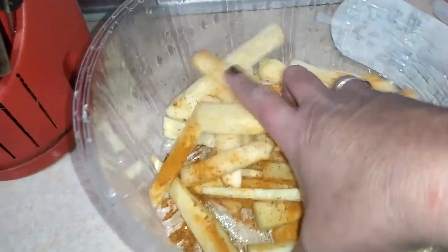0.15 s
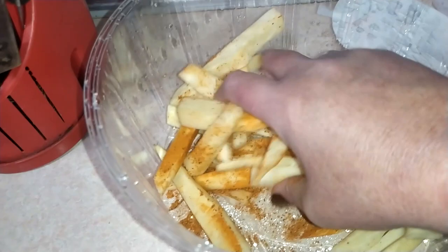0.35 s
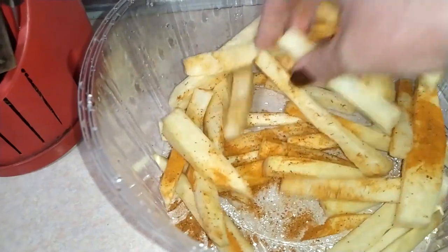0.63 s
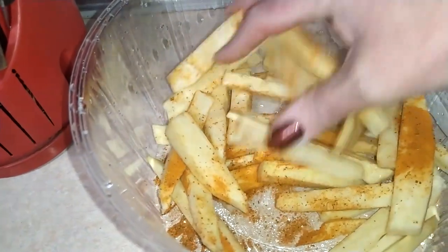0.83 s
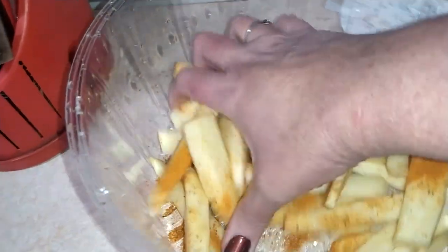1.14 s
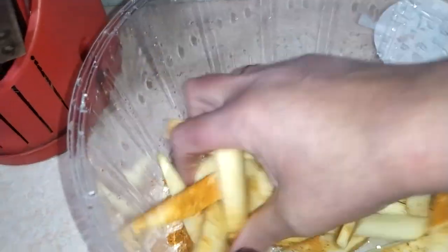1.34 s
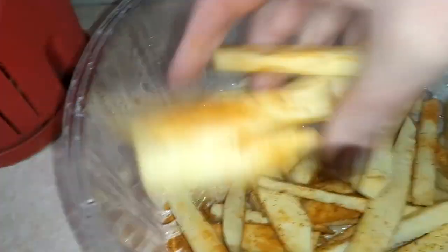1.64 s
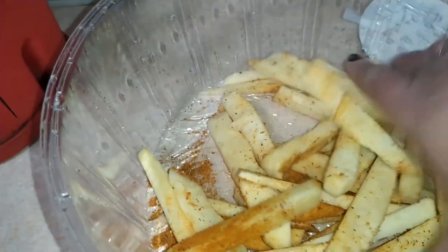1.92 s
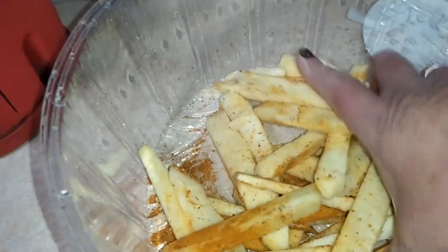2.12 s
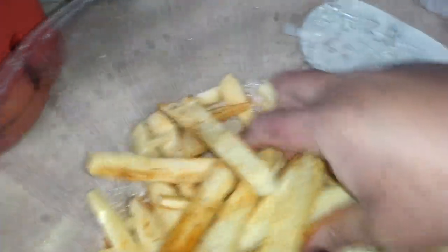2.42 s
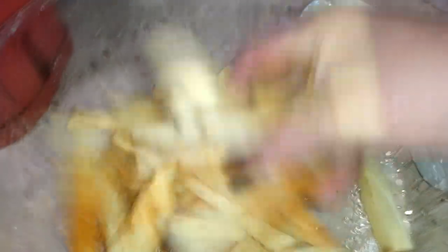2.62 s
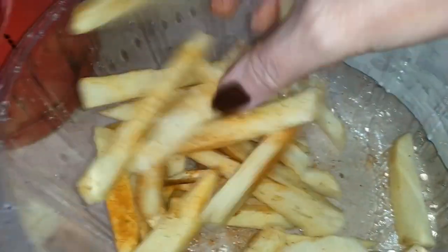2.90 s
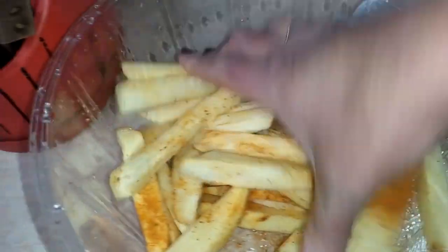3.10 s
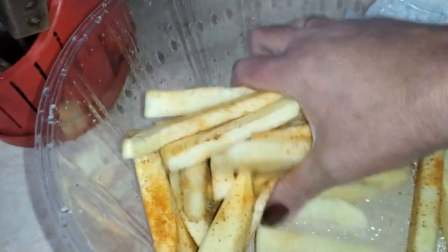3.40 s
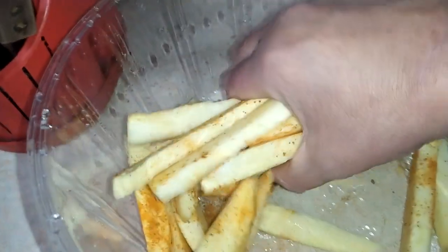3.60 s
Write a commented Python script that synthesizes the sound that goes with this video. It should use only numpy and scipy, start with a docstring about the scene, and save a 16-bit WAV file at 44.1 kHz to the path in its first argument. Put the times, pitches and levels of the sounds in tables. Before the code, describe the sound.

Raw vegetable sticks are tossed by hand in a thin plastic tub, with irregular dull thuds, woody clacks and gritty rubbing throughout, growing heavier later; close microphone, small kitchen, slightly dull sound with clipped peaks.

```python
"""Low jostling with many dull plastic thuds and clacks throughout: a hand tosses raw sweet potato sticks in a
thin tub, close up. Falling sticks excite the tub's low modes (thud), the modes of its wall (clack) and bursts
of edge grit (tick). Random contacts ring the same modes as the heap shifts; banded grains make gritty rubbing
and short scratches. A short kitchen tail and a faint, dull floor lie behind; the hardest blows clip."""
import sys
import numpy as np
from scipy import signal
from scipy.fft import rfft, irfft
from scipy.io import wavfile
from scipy.ndimage import uniform_filter1d

SR = 44100
rng = np.random.default_rng(int(sys.argv[2]) if len(sys.argv) > 2 else 0)


def pcm_store(signal):
    """Save signal as 16-bit PCM."""
    levels = np.round(np.clip(np.atleast_2d(signal), -1, 1) * 32767)
    wavfile.write(sys.argv[1], SR, levels.astype(np.int16).T)


N = 165375

# Stick landings, levels before trims: start_s, thud_db, clack_db, tick_db, clack_pitch_hz
LANDINGS = [(0.037, -19.5, -46, -32, 1130), (0.098, -17.5, -58, -25.5, 1840),
            (0.177, -17.5, -24, -23.5, 1160), (0.209, -22, -24.5, -28, 766),
            (0.286, -18, -24.5, -25.5, 1000), (0.316, -10.5, -22, -15, 3120), (0.437, -19, -34.5, -38, 780),
            (0.499, -14, -22, -38, 645), (0.544, -11.5, -24, -40, 1720), (0.553, -19, -22.5, -40.5, 1290),
            (0.717, -21, -31, -50, 1150), (0.893, -12.5, -45, -43, 1150), (0.933, -16, -17.5, -26.5, 1220),
            (0.948, -15, -21.5, -30.5, 1210), (1.092, -15.5, -21, -29, 1215),
            (1.119, -18.5, -17, -33.5, 1694), (1.1989, -11.5, -11.5, -28.5, 853),
            (1.256, -18, -19, -19.5, 2140), (1.297, -16, -11, -15, 2080), (1.337, -48, -20, -30.5, 2100),
            (1.437, -14.5, -26.5, -38, 807), (1.516, -8, -12, -25, 1135), (1.524, -10.5, -18, -28, 1094),
            (1.676, -20, -48, -58, 1040), (1.792, -27, -32.5, -41, 742), (1.809, -15.5, -28, -27.5, 1110),
            (1.831, -16, -23.5, -27.5, 1045), (1.892, -15.5, -22, -26, 800), (1.956, -17, -22, -28, 890),
            (2.041, -18, -24.5, -41.5, 1220), (2.084, -18.5, -31.5, -32.5, 830),
            (2.273, -5.5, -9.5, -7, 1820), (2.332, -10, -17.5, -35.5, 740), (2.352, -13, -20.5, -19.5, 816),
            (2.408, -13, -18.5, -48, 730), (2.538, -8.5, -20, -25.5, 830), (2.664, -15, -42, -38, 1140),
            (2.752, -8.5, -26, -24, 1600), (2.764, -14, -22, -39, 775), (2.924, -16, -16.5, -21, 1880),
            (2.968, -16, -37, -30, 920), (3.018, -7.5, -17.5, -35, 1160), (3.027, -7, -12, -19, 1142),
            (3.039, -3, -14.5, -27.5, 1040), (3.054, -15.5, -21, -56, 1150), (3.102, -45, -43, -24, 4700),
            (3.16, -12.5, -16, -34, 687), (3.22, -10.5, -26.5, -26, 742), (3.269, -10.5, -25.5, -26, 1070),
            (3.309, -20.5, -18.5, -27, 742), (3.385, -19, -21.5, -22.5, 2820),
            (3.404, -5.5, -19, -19.5, 1780), (3.437, -19, -21, -14, 1960), (3.478, -40, -24, -35, 1705),
            (3.505, -6.5, -19.5, -37.5, 1100), (3.521, -23.5, -11, -16.5, 1780),
            (3.637, -14.5, -21.5, -22, 2330)]
# Hand working the heap, levels before trims: time_s, jostle_db, rub_db
HAND_STIR = [(0, -23, -31), (0.12, -40.5, -35), (0.19, -19.5, -22.5), (0.32, -20.5, -29),
             (0.41, -35.5, -40), (0.53, -20.5, -33), (0.62, -25.5, -43), (0.86, -36, -45.5),
             (0.97, -19, -34.5), (1.035, -36, -43.5), (1.119, -25.5, -35.5), (1.275, -20.5, -24),
             (1.341, -17.5, -27), (1.385, -31, -31), (1.485, -16.5, -25.5), (1.56, -19.5, -38),
             (1.63, -25.5, -31.5), (1.775, -49, -52), (1.83, -14, -44), (1.94, -41, -33),
             (2.11, -23, -39.5), (2.218, -37, -38.5), (2.305, -8, -16), (2.45, -24.5, -29.5),
             (2.58, -22, -22.5), (2.64, -28.5, -34), (2.831, -14.5, -26), (2.905, -29, -50),
             (2.95, -11, -32), (3.1, -19, -32.5), (3.281, -14, -24.5), (3.35, -25, -37.5),
             (3.419, -16.5, -19.5), (3.58, -26.5, -34.5), (3.75, -27.5, -27)]
# Modes of the loaded tub: freq_hz, level_db, t60_s
TUB_MODES = [(66.5, -13, 0.15), (103.8, -5, 0.096), (180.6, 0.5, 0.084), (211, 1, 0.088), (248.7, 3, 0.08),
             (308, 0.5, 0.084), (353.5, 4.5, 0.16), (399.3, 4.5, 0.094), (464, 0, 0.067)]
# Modes of the tub wall where sticks knock against it: freq_hz, level_db, t60_s
WALL_MODES = [(608.6, -4, 0.052), (762, 2.5, 0.029), (838, 6.5, 0.014), (1047, -2, 0.035),
              (1175.5, -2, 0.067), (1527, -7.5, 0.056), (1790, -6.5, 0.086), (2084, -6, 0.074),
              (2644, -4, 0.029)]
# Filter colour of an edge tick: freq_hz, gain_db
TICK_COLOUR = [(500, -16), (1500, -7), (3600, 5.5), (5200, 1.5), (7400, 6.5), (9000, -18)]
# Filter colour of the rubbing: freq_hz, gain_db
RUB_COLOUR = [(300, 20), (900, 1), (2000, 0), (3400, 0.5), (5400, -1.5), (7400, 4), (9000, -24.5)]
# Filter colour of a scuff of damp flesh: freq_hz, gain_db
FLESH_COLOUR = [(250, 2), (700, 3), (1900, 0), (3000, -3.5), (8000, -29.5)]

# Blows: trims, and the opening span whose level is set
THUD_TRIM_DB, CLACK_TRIM_DB, TICK_TRIM_DB, BLOW_S = -3, 2.5, 0, 0.012
# Each blow lands on another spot under another load: log-gain and relative-frequency spreads
SPOT_LOG_SPREAD, TUB_DETUNE, WALL_DETUNE = 0.34, 0.038, 0.044
# Push of a stick bouncing on the springy floor; a blow with more thud than clack is softer, pushes longer
EQUAL_PUSH_HZ, PUSH_T60_S, SOFTNESS_OCT_PER_DB = 396, 0.012, 0.2449
CHATTER_PER_S, CHATTER_GAIN, CHATTER_SPREAD_DB, CHATTER_DECAY_S = 900, 0.46, 0.57, 0.0045
# A blow with more tick is harder and clacks brighter; cutoff is REF_CONTACT_HZ at REF_HARDNESS_DB
REF_CONTACT_HZ, REF_HARDNESS_DB, HARDNESS_OCT_PER_DB = 3460, -15, 0.65
LEAD_DB, LEAD_T60_S = -1.5, 0.031  # the mode a blow excites most
FLESH_DB, FLESH_DECAY_S = -1.5, 0.013
GRIT_PER_S, GRIT_SPREAD_DB, GRIT_RISE_S, TICK_DECAY_S = 9000, 0.7, 0.00017, 0.009
EDGE_LOW_HZ, EDGE_HIGH_HZ, EDGE_T60_S, EDGE_DB = 2554, 7450, 0.0084, -9.5

# Heap
BUMPS_PER_S, BUMP_SPREAD_DB, BUMP_TRIM_DB = 100, 1.5, -2.5
TAPS_PER_S, TAP_SPREAD_DB, TAP_TRIM_DB = 150, 3.5, -4
GRAINS_PER_S, GRAIN_SPREAD_DB, GRAIN_DECAY_S, RUB_TRIM_DB = 3800, 5, 0.00058, -3.5  # rate per face
HEAP_FLUTTER_DB, FACE_FLUTTER_DB, FLUTTER_S = 2.2, -1.5, 0.0055
SCRAPES_PER_S, SCRAPE_DECAY_S, SCRAPE_RANGE_DB, SCRAPE_TRIM_DB = 70, 0.0039, 14, -6.5

# Kitchen, background and recorder
ROOM_SPLIT_HZ, ROOM_RISE_S = 1000, 0.0035
ROOM_LOW_T60_S, ROOM_HIGH_T60_S, ROOM_LOW_DB, ROOM_HIGH_DB = 0.41, 0.12, -10, -18
FLOOR_DB, FLOOR_TOP_HZ = -62, 350
DRIVE_DB, MIC_LOW_HZ, MIC_TOP_HZ, OUTPUT_TOP_HZ = 1, 50, 7850, 16000


def landings():
    """Each stick pushes the tub, chatters and scuffs as it settles, and ticks at its edge."""
    out, t = np.zeros(N), np.arange(SR // 7) / SR
    for start_s, thud_db, clack_db, tick_db, pitch_hz in LANDINGS:
        thud_sound = thud(t, thud_db - clack_db)
        clack_sound = clack(t, pitch_hz, tick_db - clack_db)
        add(out, start_s, blow(thud_sound, thud_db + THUD_TRIM_DB))
        add(out, start_s, blow(clack_sound, clack_db + CLACK_TRIM_DB))
        add(out, start_s, blow(tick(t), tick_db + TICK_TRIM_DB))
    return out


def thud(t, softness_db):
    """A damped push, lower in frequency for softer blows, drives the tub modes."""
    push_hz = EQUAL_PUSH_HZ / 2 ** (SOFTNESS_OCT_PER_DB * softness_db)
    push = np.gradient(note(t, push_hz, PUSH_T60_S))
    return signal.fftconvolve(ring(TUB_MODES, TUB_DETUNE), push)


def clack(t, pitch_hz, hardness_db):
    """Chattering contacts ring the wall modes and a lead mode; soft contact dulls them and the scuff."""
    chatter = CHATTER_GAIN * contacts(CHATTER_PER_S, CHATTER_SPREAD_DB, size=len(t))
    chatter *= np.exp(-t / CHATTER_DECAY_S)
    chatter[0] = 1  # the landing itself
    knock = signal.fftconvolve(ring(WALL_MODES, WALL_DETUNE), chatter)[:len(t)]
    lead = signal.fftconvolve(note(t, pitch_hz, LEAD_T60_S), chatter)[:len(t)]
    flesh = scuff(t, FLESH_DECAY_S, FLESH_COLOUR)
    mix = blow(knock, 0) + blow(lead, LEAD_DB) + blow(flesh, FLESH_DB)
    octaves = HARDNESS_OCT_PER_DB * (hardness_db - REF_HARDNESS_DB)
    cutoff_hz = np.clip(REF_CONTACT_HZ * 2 ** octaves, 600, 9000)
    return butter(mix, cutoff_hz, "low")


def tick(t):
    """The crisp scuff of an edge drives a brief ring at a random pitch."""
    grit = scuff(t, TICK_DECAY_S, TICK_COLOUR)
    edge_hz = EDGE_LOW_HZ * (EDGE_HIGH_HZ / EDGE_LOW_HZ) ** rng.random()
    edge = signal.fftconvolve(grit, note(t, edge_hz, EDGE_T60_S))[:len(t)]
    return blow(grit, 0) + blow(edge, EDGE_DB)


def scuff(t, decay_s, points):
    """A quick burst of micro-contacts as two faces meet."""
    envelope = (1 - np.exp(-t / GRIT_RISE_S)) * np.exp(-t / decay_s)
    grit = contacts(GRIT_PER_S, GRIT_SPREAD_DB, size=len(t)) * envelope
    padded = np.pad(grit, (0, len(t)))  # keeps the filter from wrapping round
    return colour(padded, points)[:len(t)]


def heap():
    """Shifting sticks bump the tub, tap each other, rub and scrape."""
    t = np.arange(N) / SR
    time_s, low_db, high_db = np.array(HAND_STIR).T
    jostle_db = np.interp(t, time_s, low_db)
    rub_db = np.interp(t, time_s, high_db)
    bumps = patter(TUB_MODES, TUB_DETUNE, BUMPS_PER_S, BUMP_SPREAD_DB, count=14)
    taps = patter(WALL_MODES, WALL_DETUNE, TAPS_PER_S, TAP_SPREAD_DB, count=22)
    out = bumps * undb(jostle_db + BUMP_TRIM_DB)
    out += taps * undb((jostle_db + rub_db) / 2 + TAP_TRIM_DB)
    out += rubbing() * undb(rub_db + RUB_TRIM_DB)
    out += scrapes() * undb(rub_db + SCRAPE_TRIM_DB)
    return out


def patter(modes, detune, per_s, spread_db, count):
    """Many small contacts spread over several spots, each with its own ring."""
    out = np.zeros(N)
    for _ in range(count):
        hits = contacts(per_s / count, spread_db)
        out += signal.fftconvolve(hits, unit(ring(modes, detune)))[:N]
    return unit(out)


def rubbing(count=7):
    """Gritty faces slide; each has its own pitch range and catches and slips by itself."""
    t = np.arange(SR // 100) / SR
    edges_hz = np.geomspace(600, 9000, count + 1)
    out = np.zeros(N)
    for low_hz, high_hz in zip(edges_hz, edges_hz[1:]):
        grains = np.zeros(N)
        for _ in range(2):  # two grain shapes per face
            grain = rng.standard_normal(len(t)) * np.exp(-t / GRAIN_DECAY_S)
            hits = contacts(GRAINS_PER_S / 2, GRAIN_SPREAD_DB)
            grains += signal.fftconvolve(hits, grain)[:N]
        face = unit(butter(grains, [low_hz, high_hz], "band")) * np.sqrt(high_hz - low_hz)
        out += face * undb(FACE_FLUTTER_DB * flutter())
    return unit(colour(out, RUB_COLOUR)) * undb(HEAP_FLUTTER_DB * flutter())


def scrapes():
    """Edges catch and slip: brief noise scratches, each in its own half octave."""
    out, t = np.zeros(N), np.arange(SR // 40) / SR
    for when, pitch, size in rng.random((int(SCRAPES_PER_S * N / SR), 3)):
        low_hz = EDGE_HIGH_HZ * (EDGE_LOW_HZ / 2 / EDGE_HIGH_HZ) ** pitch
        burst = rng.standard_normal(len(t)) * t * np.exp(-t / SCRAPE_DECAY_S)
        scratch = butter(burst, [low_hz, low_hz * np.sqrt(2)], "band", order=1)
        add(out, when * N / SR, unit(scratch) * undb(SCRAPE_RANGE_DB * size))
    return unit(out)


def kitchen(x):
    """A short, diffuse room tail with its own decay for bass and treble."""
    t = np.arange(SR // 2) / SR
    noise = rng.standard_normal(len(t))
    tail = np.zeros(len(t))
    bands = (("low", ROOM_LOW_T60_S, ROOM_LOW_DB), ("high", ROOM_HIGH_T60_S, ROOM_HIGH_DB))
    for kind, t60_s, level_db in bands:
        fade = np.exp(-np.log(1000) * t / t60_s) * (1 - np.exp(-t / ROOM_RISE_S))
        band = butter(noise, ROOM_SPLIT_HZ, kind, order=3)
        tail += band * fade / np.linalg.norm(fade) * undb(level_db)
    return signal.fftconvolve(x, tail)[:N]


def background():
    """Faint, dull low-passed noise."""
    return unit(butter(rng.standard_normal(N), FLOOR_TOP_HZ, "low", order=1)) * undb(FLOOR_DB)


def undb(db):
    """Decibels to gain."""
    return 10 ** (np.asarray(db) / 20)


def unit(x):
    """Scale to rms 1."""
    return x / np.sqrt(np.mean(x ** 2) + 1e-18)


def add(out, start_s, x):
    """Mix x into out from a time on."""
    i = max(int(start_s * SR), 0)
    out[i:i + len(x)] += x[:max(N - i, 0)]


def colour(x, points):
    """Filter by a spectrum, interpolated over log frequency."""
    hz, db = np.array(points).T
    f = np.fft.rfftfreq(len(x), 1 / SR) + 1  # +1 avoids log(0)
    gain = undb(np.interp(np.log(f), np.log(hz), db))
    return irfft(rfft(x) * gain, len(x))


def butter(x, hz, kind, order=2):
    """Plain low-, high- or band-pass."""
    return signal.sosfilt(signal.butter(order, hz, kind, fs=SR, output="sos"), x)


def note(t, hz, t60_s):
    """One decaying mode."""
    return np.sin(2 * np.pi * hz * t) * np.exp(-np.log(1000) * t / t60_s)


def ring(modes, detune):
    """A sum of decaying modes, weighted and detuned by where the blow lands."""
    hz, db, t60_s = np.array(modes).T[:, :, None]
    t = np.arange(SR // 7) / SR
    spot, shift, side = rng.standard_normal((3, len(modes), 1))
    gain = undb(db) * np.exp(SPOT_LOG_SPREAD * spot) * np.sign(side)
    return np.sum(gain * note(t, hz * (1 + detune * shift), t60_s), axis=0)


def contacts(per_s, spread_db, size=N):
    """Random impulses of either sign, most small and a few large."""
    when, strength, sign = rng.random((3, size))
    tail = np.minimum(-np.log(1 - strength), 4)
    return (when < per_s / SR) * undb(spread_db * tail) * np.sign(sign - .5)


def blow(x, db):
    """Set the level of the first instant of a blow."""
    return x * undb(db) / (x[:int(BLOW_S * SR)].std() + 1e-12)


def flutter():
    """A quick random wavering of rms 1: noise smoothed twice."""
    width = max(int(FLUTTER_S * SR), 4)
    smooth = uniform_filter1d(rng.standard_normal(N), width)
    return unit(uniform_filter1d(smooth, width // 2))


def scene():
    """The tub in the kitchen over a faint, dull background."""
    tub = landings() + heap()
    return (tub + kitchen(tub) + background())[None]


def record(dry):
    """A narrow-band microphone whose loudest peaks clip; a low-pass follows the clipping."""
    mic_filter = signal.ellip(7, .3, 60, MIC_TOP_HZ, fs=SR, output="sos")
    band = signal.sosfilt(mic_filter, butter(dry, MIC_LOW_HZ, "high", order=4))
    clipped = np.clip(band * undb(DRIVE_DB), -1, 1)
    return butter(clipped, OUTPUT_TOP_HZ, "low", order=12)


dry = scene()
out = record(dry)
pcm_store(out)
```